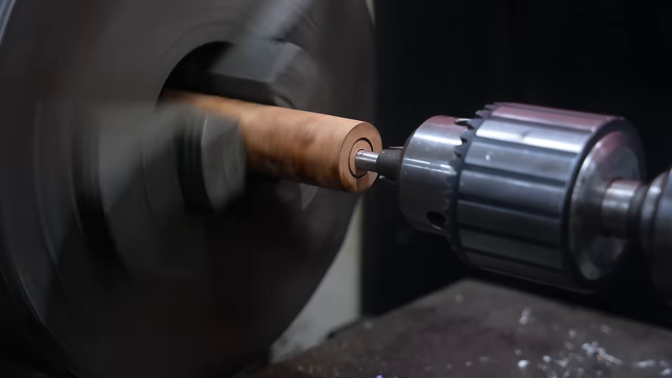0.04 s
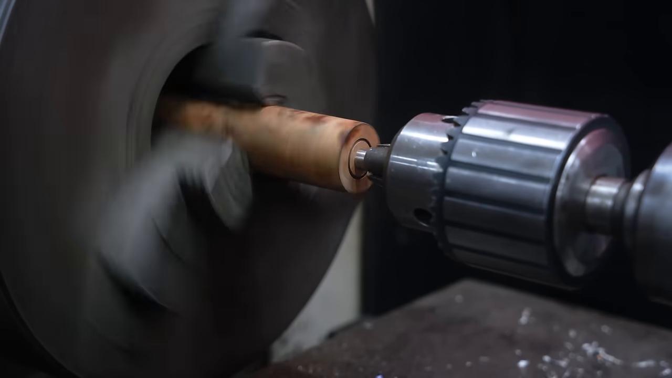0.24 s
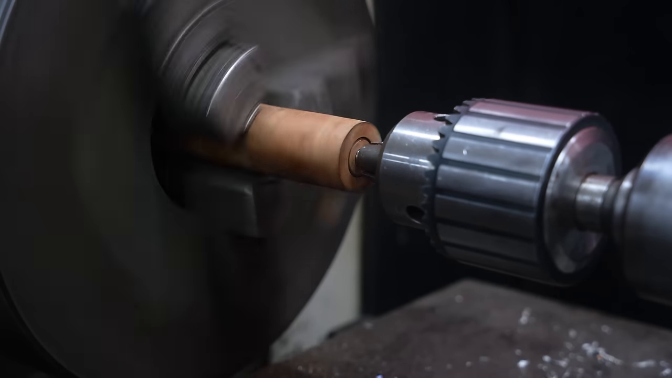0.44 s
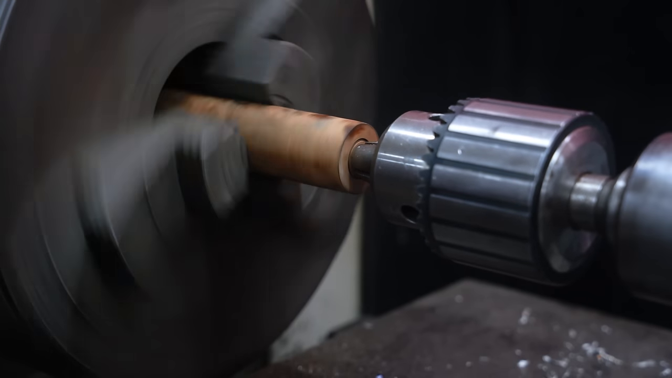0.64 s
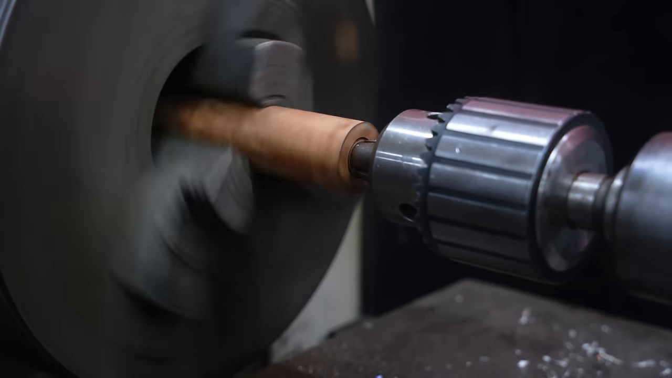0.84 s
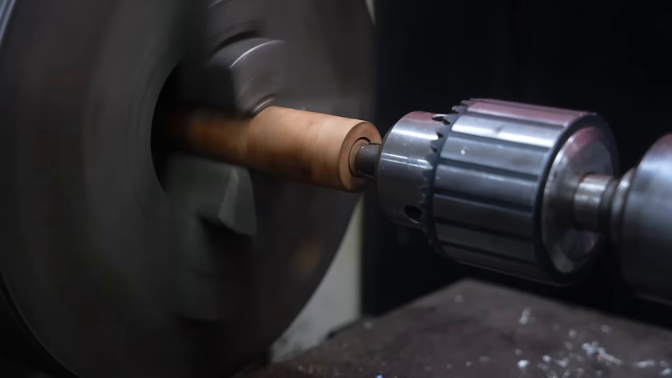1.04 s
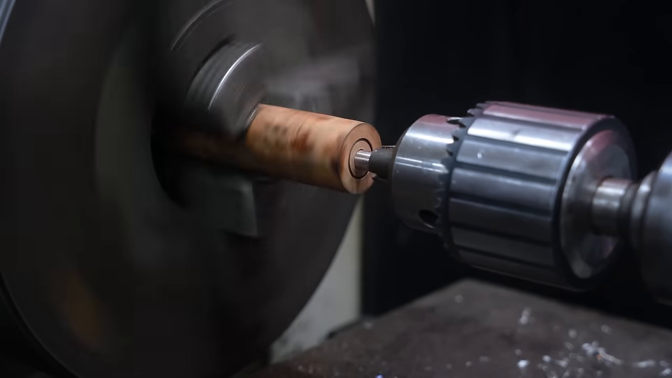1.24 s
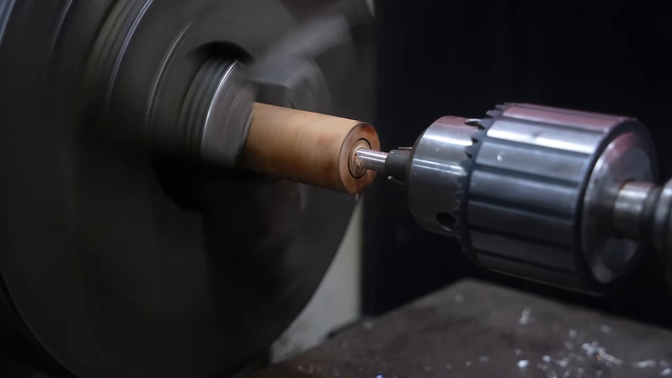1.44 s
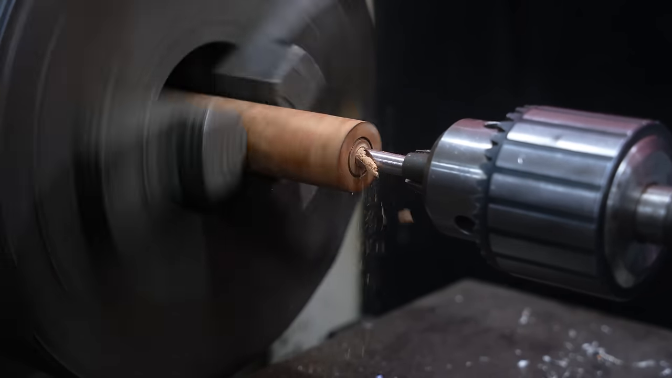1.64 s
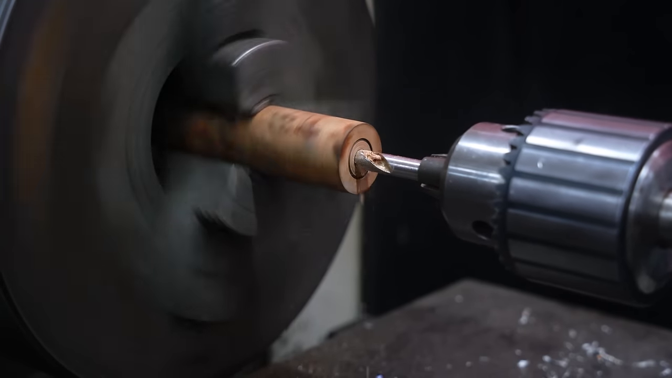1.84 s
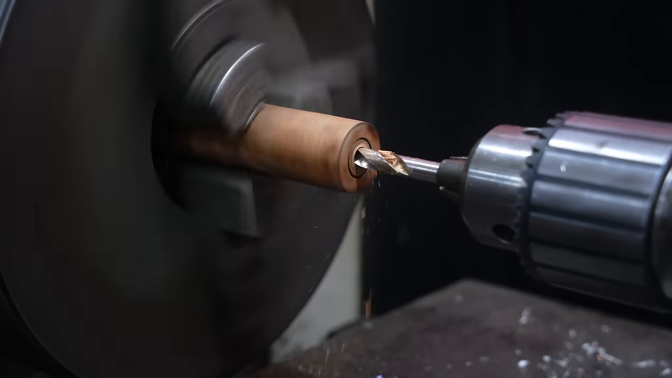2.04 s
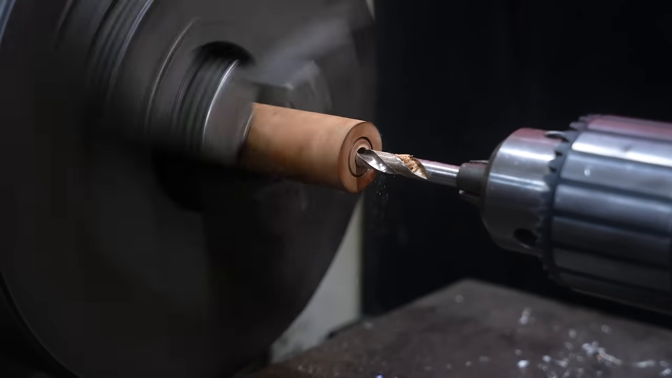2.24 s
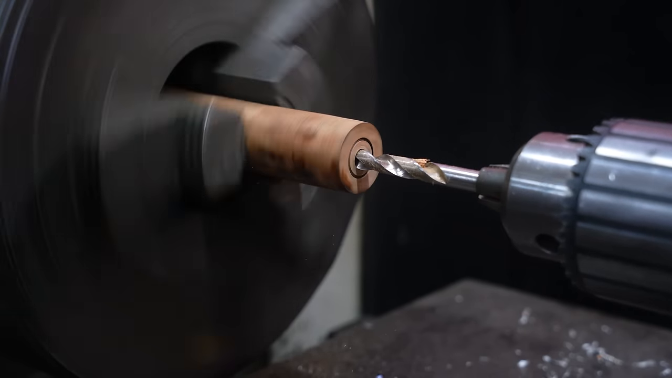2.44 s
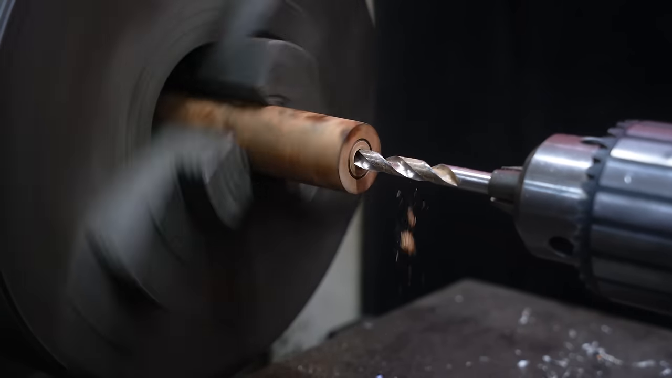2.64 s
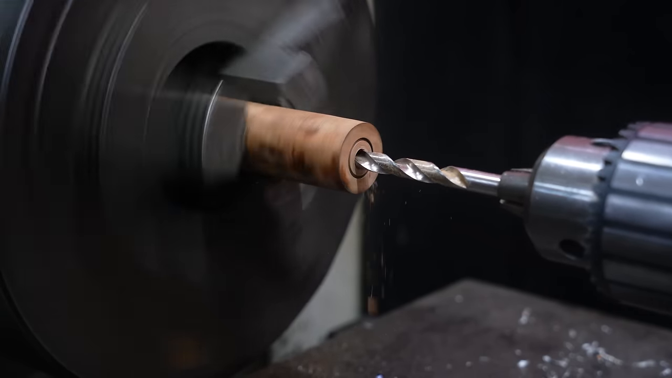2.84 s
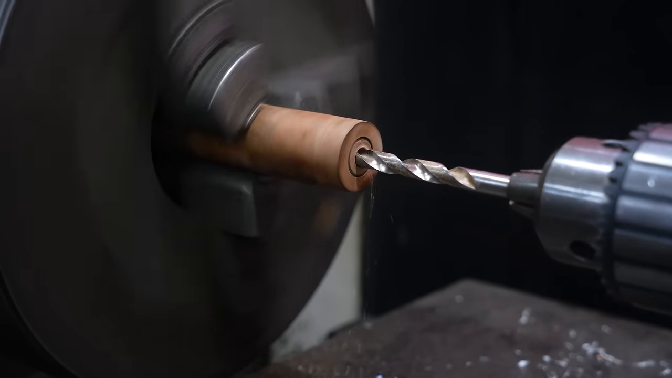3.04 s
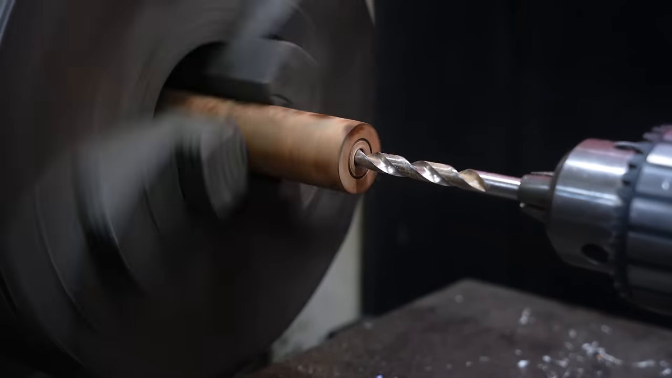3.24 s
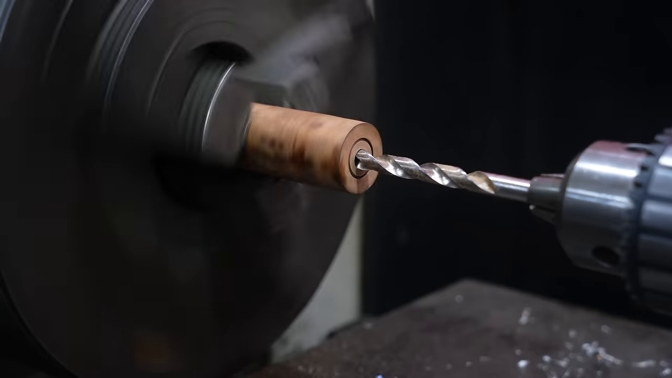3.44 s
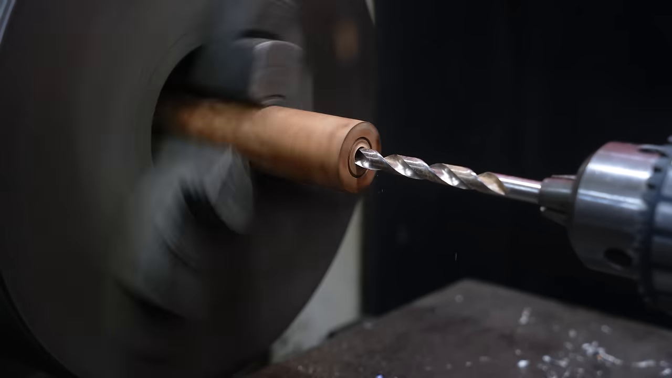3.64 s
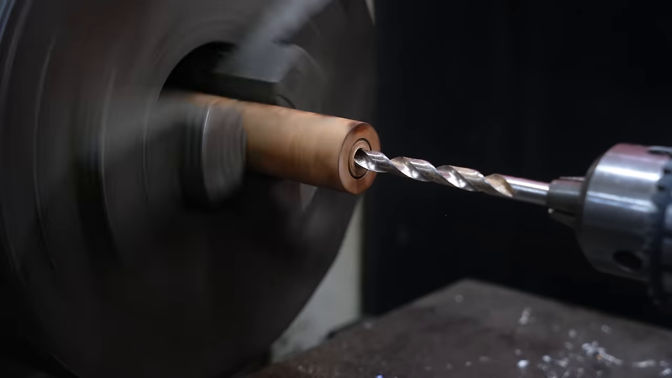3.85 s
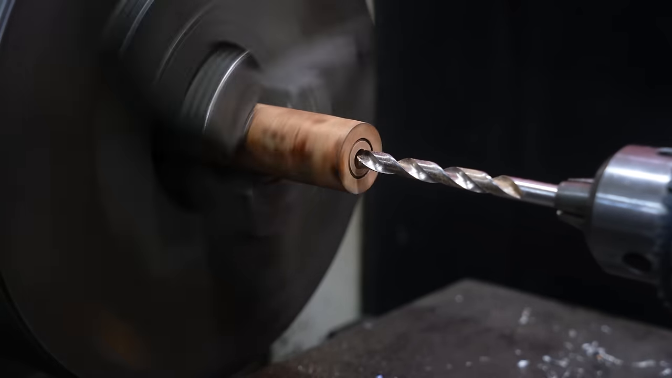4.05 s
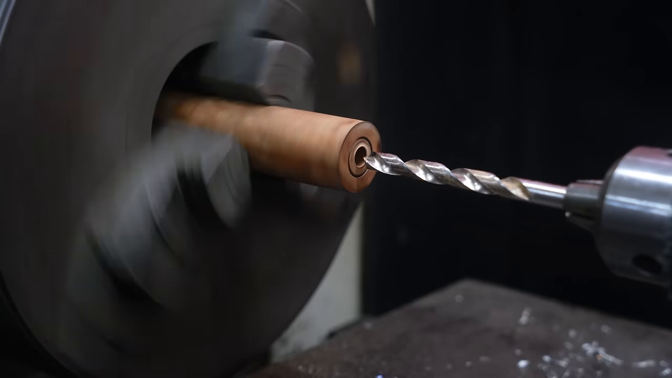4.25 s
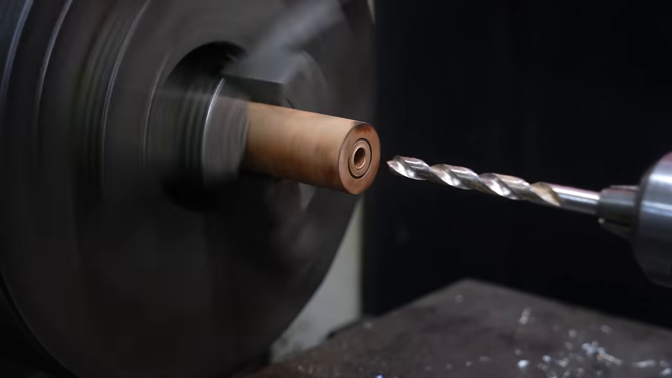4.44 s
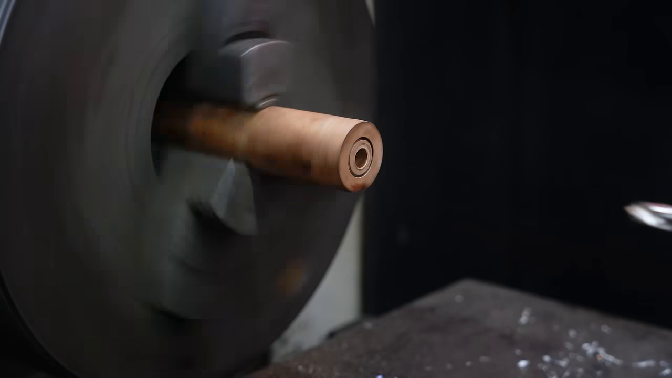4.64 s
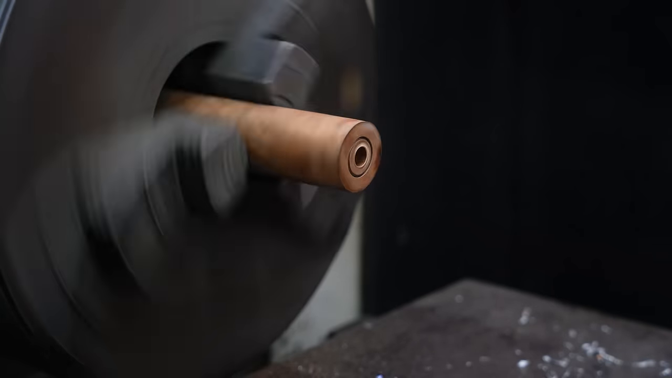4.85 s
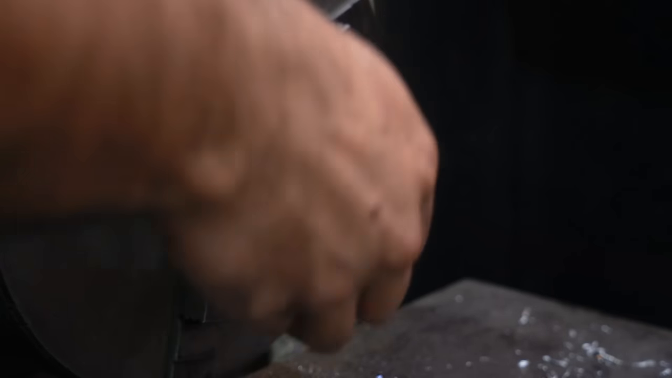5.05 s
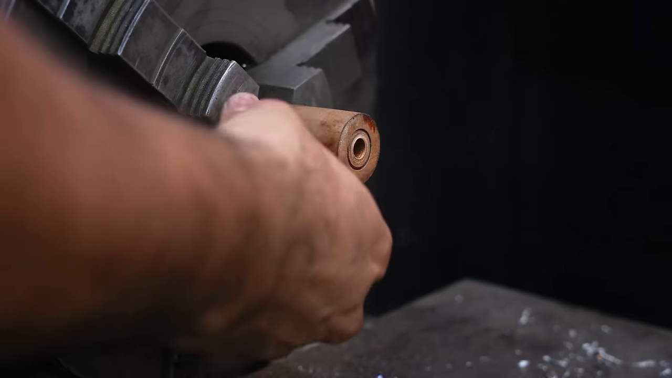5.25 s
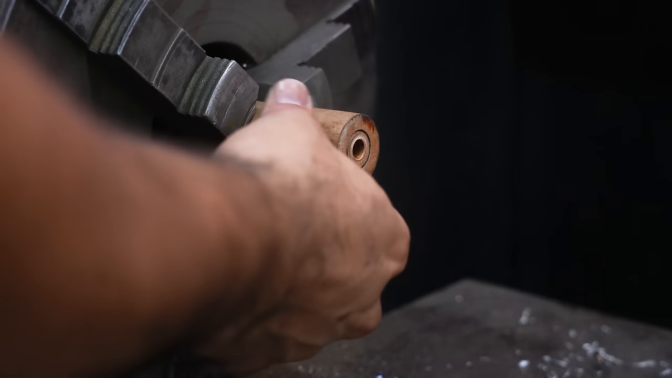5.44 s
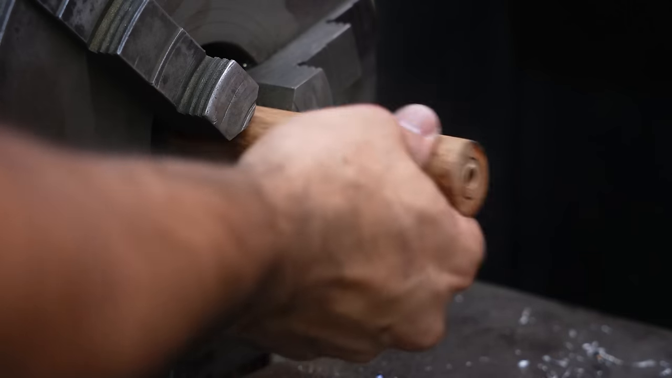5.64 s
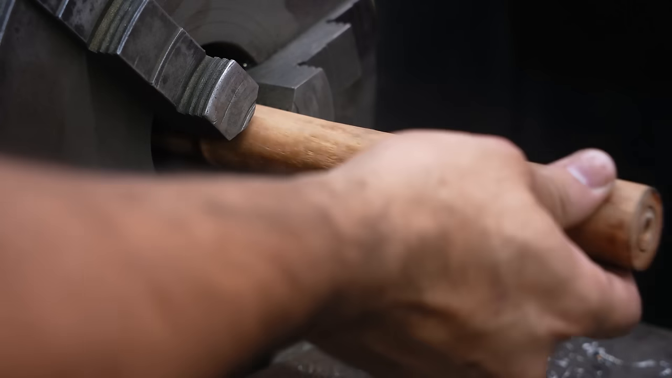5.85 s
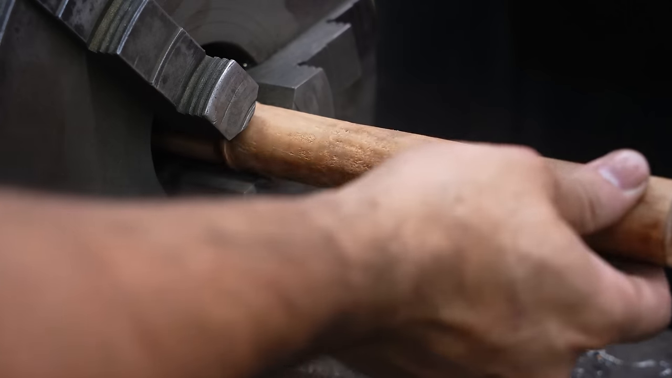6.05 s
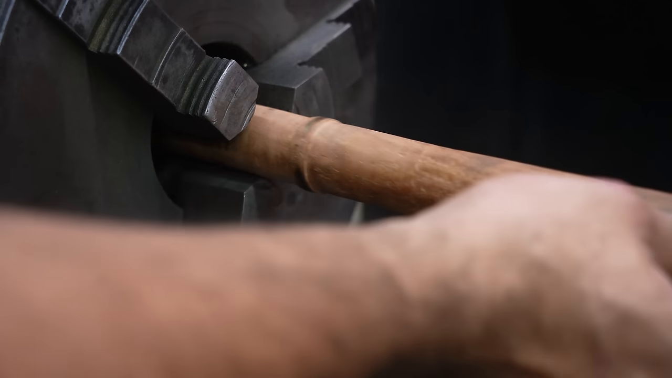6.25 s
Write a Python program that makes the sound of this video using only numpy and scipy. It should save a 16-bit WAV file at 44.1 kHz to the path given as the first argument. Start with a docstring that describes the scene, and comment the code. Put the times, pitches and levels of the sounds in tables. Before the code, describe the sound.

In a hard-walled workshop, close stereo pickup, a bit boring spinning wood gives a loud, glassy squeal that rises and falls about a dozen times a second, with several shrill pitches. It breaks into quick chirps, returns, then fades. The quieter lathe whirr becomes noticeable, with a few rattling knocks. Abruptly the machine is gone; a wooden rod scrapes, rubs against skin and clacks on metal jaws.

```python
"""A bit boring into a wooden rod spun by a lathe wails in several voices amid short squeaks, in a hard-walled workshop.
Stick-slip sines sweep twice a turn as the flutes rub the bore; gear and motor sines whine over shaped noise.
Decaying noise knocks as the tailstock is unclamped; jolts ring the bed.
After a jump in time the lathe stands still: a hand draws the rod out of the jaws, as noise and clicks excite resonances."""
import sys
import numpy as np
from scipy import signal
from scipy.fft import rfft, irfft, next_fast_len
from scipy.io import wavfile
from scipy.ndimage import uniform_filter1d

SR = 44100
rng = np.random.default_rng(int(sys.argv[2]) if len(sys.argv) > 2 else 0)


def wav_record(signal):
    """Record a signal, one row per channel, as 16-bit PCM in the file named by sys.argv[1]."""
    frames = np.transpose(np.atleast_2d(signal))
    bounded = np.clip(frames, -1, 1)
    # unit amplitude maps onto the largest positive 16-bit level
    quanta = np.round(bounded * 32767).astype(np.int16)
    wavfile.write(sys.argv[1], SR, quanta)


N = 278259
T = np.arange(N) / SR   # time in s
EAR_SIGN = np.array([[1], [-1]])   # left, right
STOP_S = 4.915   # the sound of the running lathe gives way to the rod

# Second harmonic of the squeal: t/s, level under the fundamental/dB
OCTAVE_LEVELS = [(0, -21), (.65, -25), (.8, -32), (1.5, -41.5), (2.0, -22.5), (2.2, -38), (2.45, -18),
                 (2.52, -8.5), (2.9, -22.5), (3.3, -14.5)]
# Correlation of the two ears: f/Hz, likeness (0-1)
EAR_LIKENESS = [(60, 0.74), (180, 1), (550, 0.86), (1650, 0.38), (4970, 0.11), (15000, 0.16)]


def from_db(db):
    """Level as a logarithm of amplitude: 20 dB is a factor of ten."""
    return 10 ** (np.asarray(db) / 20)


def rms_one(x):
    """Normalise by the root-mean-square amplitude."""
    return x / np.sqrt(np.mean(x ** 2) + 1e-20)


def in_time(rows):
    """Linear interpolation of each column of a time table, sample by sample."""
    times, *columns = np.transpose(rows)
    return [np.interp(T, times, column) for column in columns]


def at_hz(points, hz):
    """Interpolation of a spectrum along a logarithmic frequency axis."""
    table_hz, values = np.array(points).T
    return np.interp(np.log(hz), np.log(table_hz), values)


def between(t0, t1, fade):
    """A gate with linear ramps: 1 inside the span, 0 outside."""
    return np.clip(np.minimum(T - t0, t1 - T) / fade, 0, 1)


def drift(rate):
    """Low-pass filtered noise of spread 1, wandering at about the given rate in Hz."""
    step = 40   # samples per point of the slow noise
    pole = np.exp(-2 * np.pi * rate * step / SR)
    white = rng.standard_normal(N // step + 2002)
    slow = signal.lfilter([1], [1, -2 * pole, pole * pole], white)[2000:]   # settled part only
    fine = np.interp(np.arange(N) / step, np.arange(len(slow)), rms_one(slow))
    return uniform_filter1d(fine, size=80)


def stereo_noise(spectrum):
    """Interaural coherence: coloured noise, alike in both ears in the bass, less so in the treble; rms 1."""
    # Interaural level difference: f/Hz, left minus right/dB
    ear_lean = [(60, -1), (240, 0.5), (950, -1.5), (3770, 0.5), (15000, 0.5)]
    size = next_fast_len(N)
    hz = np.maximum(np.arange(size // 2 + 1) * SR / size, 1)
    mid, side = rfft(rng.standard_normal((2, size)))
    alike = np.clip(at_hz(EAR_LIKENESS, hz), 0, 1)
    both = np.sqrt(1 + alike) * mid + np.sqrt(1 - alike) * side * EAR_SIGN
    lean = from_db(at_hz(ear_lean, hz) / 2 * EAR_SIGN)
    coloured = both * lean * from_db(at_hz(spectrum, hz))
    return rms_one(irfft(coloured, size)[:, :N])


def tone(hz, waver_db, rate):
    """Amplitude and phase modulation of a sine, less alike in the two ears where coherence is low."""
    phase = 2 * np.pi * np.cumsum(hz) / SR + .5 * drift(rate)
    swell = drift(rate)
    apart = 1 - np.clip(at_hz(EAR_LIKENESS, hz[0]), 0, 1)
    ears = []
    for _ in range(2):
        strength = np.sqrt(2) * from_db(waver_db * (swell + apart * drift(rate)))
        ears.append(strength * np.sin(phase + apart * drift(5.4)))
    return np.array(ears)


def ring(x, hz, t60):
    """A damped oscillator: a unit click starts a sine of initial height about 1, falling 60 dB in t60 seconds."""
    r, w = from_db(-60 / (t60 * SR)), 2 * np.pi * hz / SR
    return signal.lfilter([0, np.sin(w)], [1, -2 * r * np.cos(w), r * r], x + 1e-18)


def ring_wide(x, hz, width):
    """Resonance as a band-pass whose Q is centre frequency over bandwidth; rms 1."""
    return rms_one(signal.lfilter(*signal.iirpeak(hz, hz / width, fs=SR), x))


def workshop(x, t60=0.61, level_db=-6):
    """Reverberation: direct sound plus an exponentially dying tail of reflections, another in each ear."""
    t = T[:SR]
    build_up = np.clip(t / 0.011, 0, 1)
    tail = rng.standard_normal((2, SR)) * from_db(-60 * t / t60) * build_up
    tail /= np.sqrt(np.sum(tail ** 2, axis=1, keepdims=True))   # unit energy
    reflected = signal.fftconvolve(np.broadcast_to(x, (2, N)), tail, axes=1)[:, :N]
    return x + from_db(level_db) * reflected


def squeal():
    """Stick-slip friction drives voices and squeaks; the squeal has a short reverberation."""
    # Voices of the bit: t/s, lowest f/Hz, highest f/Hz, level/dB, loss where the grip is weakest/dB
    low_voice = [(0, 6675, 7710, -13.5, 6.5), (.45, 6803, 7870, -15, 5), (.62, 6970, 7900, -26.5, -6.5),
                 (.66, 7100, 7890, -16, 36.5), (.9, 7300, 7795, -11.5, 40), (1.67, 7250, 7826, -17, 37),
                 (1.74, 7300, 7800, -69, 48.5), (2.5, 7550, 7900, -67, 15), (2.525, 7250, 8460, -26, -4.5),
                 (2.66, 7370, 7880, -19.5, 1), (2.8, 6910, 7480, -20, 0.5), (2.86, 7220, 7130, -40, 9)]
    middle_voice = [(0.269, 9900, 10000, -46, 24), (.3, 10200, 10460, -16.5, 18),
                    (0.421, 10010, 10500, -31, 27), (0.459, 9980, 10520, -16.5, 6.1),
                    (.7, 10270, 10580, -20.5, 2.9), (.95, 10230, 10710, -22, 7.5),
                    (1.05, 10240, 10600, -16, 15), (1.64, 10210, 10520, -15.5, 26),
                    (1.69, 10300, 10900, -73, 35)]
    high_voice = [(.94, 11250, 11800, -73.5, 40), (.98, 10800, 11600, -20, 16),
                  (1.4, 10900, 11710, -5.5, 84), (1.68, 10870, 11900, -1, 240),
                  (1.732, 11230, 11800, -21, 6.8), (1.905, 10900, 11650, -22, 4.2),
                  (2.08, 10700, 11570, -9, 25), (2.1, 10660, 11600, -57.5, 6)]
    last_voice = [(2.879, 6140, 6220, -70, 8), (3.031, 6200, 6500, -40.5, 10), (3.2, 6080, 6230, -62.5, 10),
                  (3.341, 6190, 6300, -44, 13), (3.4, 6065, 6190, -29, 23), (3.531, 6100, 6130, -31, 4.1),
                  (3.699, 6290, 6090, -36, 5.9), (3.73, 6200, 6180, -60, 5)]
    # Each voice within a pass: share at which the pitch is lowest, share spent climbing
    pass_timing = [(.49, .56), (.27, .68), (.19, .76), (.5, .55)]
    # Grip of each voice: second flute weaker by/dB, weakness at bottom, mid climb, top, mid drop
    grip_cycles = [(3.0, 1.1, .6, 0.0, 2.1), (1.5, .1, 0.0, 1.0, .8), (1.5, .6, 1.4, .25, 0.0),
                   (1.5, 0.0, .6, 1.0, .6)]
    # Left minus right of each voice: level/dB
    voice_leans = [0.17, -1.8, -1.2, -1.7]
    jump_s, squeal_t60_s, squeal_room_db = 2.535, 0.33, -8

    voices = (low_voice, middle_voice, high_voice, last_voice)
    dry_squeal = squeaks() + sum(map(wail, voices, pass_timing, grip_cycles, voice_leans))
    dry_squeal *= from_db(drift(45)) * between(0, 9, 0.001)   # the grip on the grain flutters
    # the sound jumps ahead in time: the first part's reverberation is faded out there
    early = between(-1, jump_s - .01, .005)
    first = workshop(dry_squeal * early, squeal_t60_s, squeal_room_db)
    later = workshop(dry_squeal * (1 - early), squeal_t60_s, squeal_room_db)
    return first * between(-1, jump_s + .03, .05) + later


def wail(voice, timing, cycle, lean_db):
    """Periodic stick-slip: each pass the pitch climbs and falls as a flute's bite and grip vary."""
    # Flutes that have passed one spot of the bore: count
    pass_counts = [-1, 7, 11, 35, 37, 50]
    # When each count is reached: t/s
    pass_times = [-.015, .61, .917, 2.715, 2.845, 3.797]
    low_hz, high_hz, level_db, dip_db = in_time(voice)
    bottom, climb = timing
    second_db, *weak = cycle
    passes = np.interp(T, pass_times, pass_counts) + 2 - bottom + .02 * drift(8)
    share, number = passes % 1, (passes + 0.25).astype(int)
    knots = [0, climb / 2, climb, (1 + climb) / 2, 1]
    size = round(.006 * SR)   # rounds the turns of pitch and grip

    height = np.interp(share, knots, [0, .64, 1, .64, 0])   # the pitch lingers near its top
    swing_hz = high_hz - low_hz
    bend = uniform_filter1d(low_hz + swing_hz * height, size=size)
    unsteady_hz = (15 + .06 * swing_hz) * drift(64)
    phase = 2 * np.pi * np.cumsum(bend + unsteady_hz) / SR
    phase = phase + (0.67 + 0.63 * drift(25)) * EAR_SIGN   # the ears differ in phase
    octave_gain = from_db(in_time(OCTAVE_LEVELS)[0] + 2.5 * EAR_SIGN) * (2 * bend < .4 * SR)
    wave = np.sin(phase) + octave_gain * np.sin(2 * phase)

    chance_db = 1.2 * rng.standard_normal(number.max() + 1)   # each pass bites differently
    bite_db = chance_db[number] - second_db * (number % 2)
    grip_db = level_db + bite_db - dip_db * np.interp(share, knots, weak + weak[:1])
    swell = from_db(uniform_filter1d(grip_db, size=size) + 2.3 * drift(120))
    swell = np.maximum(swell, catches(bend) * (level_db > -45))
    ear_waver_db = 1.3 * np.array([drift(60), drift(60)])
    ears = from_db(ear_waver_db + lean_db / 2 * EAR_SIGN)
    return ears * swell * wave * between(voice[0][0] - .01, voice[-1][0], 0.005)


def catches(bend):
    """Transient friction: a flute catches hard and a voice near the listed pitch flares in a sine-squared swell."""
    # Hard catches: t/s, relative level/dB, f/Hz
    flares = [(0.052, -9.5, 7670), (.117, -8, 7430), (.14, -14.5, 7640), (0.197, -11, 7500),
              (0.21, -9.5, 7750), (.226, -17.5, 7650), (0.285, -11, 7810), (0.348, -10.5, 7510),
              (0.439, -9.5, 7800), (0.585, -6.5, 7640), (.632, -14, 10300), (.735, -10.5, 10400),
              (.782, -8, 10300), (.858, -9.5, 10250), (0.882, -6, 10400), (.912, -22.5, 7780),
              (0.93, -7, 10300), (1.029, -7, 10400), (1.085, -11.5, 10300), (1.21, -14.5, 7850),
              (1.236, -13, 10300), (1.2915, -18, 11400), (1.328, -15.5, 10400), (1.559, -13.5, 10400),
              (1.755, -14, 11300), (1.811, -15.5, 11700), (1.901, -15.5, 11000)]
    rise_s, fall_s = 0.004, 0.014
    out, t = np.zeros(N), T[:SR // 10]
    stage = np.interp(t, [0, rise_s, rise_s + fall_s], [0, 1, 2])
    shape = np.sin(np.pi / 2 * stage) ** 2
    for start_s, db, hz in flares:
        at = round(start_s * SR) - round(.002 * SR)   # begins 2 ms ahead
        if abs(bend[at] - hz) < 450:
            out[at:at + len(t)] += from_db(db - 0.5) * shape
    return out


def squeaks():
    """Stick-slip glides: each squeak is a sine with a smooth swell, and slip adds its octave."""
    # Short squeaks: start t/s, relative level/dB, length/s, first f/Hz, last f/Hz
    short_squeaks = [(0.001, -31, 0.041, 9260, 9030), (0.141, -34.5, 0.036, 9700, 10180),
                     (0.712, -24, 0.026, 7020, 7100), (0.714, -27.5, 0.033, 9640, 9600),
                     (1.976, -27.5, 0.013, 7160, 6530), (2.002, -17.5, 0.0045, 6900, 6620),
                     (2.087, -39.5, 0.01, 7500, 7850), (2.1, -18, 0.012, 10900, 11140),
                     (2.115, -17.5, 0.014, 11600, 12000), (2.116, -23, 0.02, 6950, 6030),
                     (2.135, -18.5, 0.014, 11270, 11620), (2.178, -18, 0.018, 10930, 10650),
                     (2.193, -36, 0.035, 5750, 5760), (2.199, -14, 0.019, 10260, 10650),
                     (2.219, -27.5, 0.0082, 6700, 6150), (2.255, -18.5, 0.02, 11900, 10800),
                     (2.271, -33, 0.022, 5680, 5630), (2.273, -16, 0.023, 10350, 10340),
                     (2.297, -13, 0.016, 12200, 12060), (2.316, -19, 0.025, 10720, 10100),
                     (2.334, -27, 0.014, 11650, 11500), (2.344, -24, 0.026, 10000, 10200),
                     (2.385, -22, 0.029, 10520, 10200), (2.357, -25.5, 0.0057, 6360, 7350),
                     (2.409, -22, 0.044, 10130, 10500), (2.419, -17, 0.01, 9850, 9870),
                     (2.422, -26, 0.011, 6170, 7080), (2.45, -22.5, 0.042, 10230, 10140),
                     (2.484, -21, 0.037, 9740, 10030), (2.497, -23, 0.024, 6960, 6970),
                     (2.687, -20, 0.016, 8130, 8800)]
    out = np.zeros((2, N))
    octave_db, = in_time(OCTAVE_LEVELS)
    jitter_hz = 90 * drift(140)
    chance = rng.standard_normal((len(short_squeaks), 3))
    for (start_s, db, length, hz0, hz1), (start, pan, skew) in zip(short_squeaks, chance):
        # x runs 0..1 over the listed length; the swell extends beyond it
        x = np.arange(-.25 * length * SR, 1.18 * length * SR) / (length * SR)
        at = np.arange(len(x)) + round((start_s - .25 * length) * SR)
        hz = hz0 + (hz1 - hz0) * x + jitter_hz[at]
        phase = 2 * np.pi * np.cumsum(hz) / SR + np.pi * start + 1.055 * skew * EAR_SIGN
        octave = from_db(octave_db[at]) * (2 * hz0 < .4 * SR) * np.sin(2 * phase)
        ear_gain = from_db(db + 2 + (-1.5 + 2 * pan) * EAR_SIGN)
        wave = ear_gain * np.hanning(len(x)) * (np.sin(phase) + octave)
        out[:, at[at >= 0]] += wave[:, at >= 0]
    return out


def lathe():
    """Gear-mesh harmonics and motor tones over broadband rush of bearings, belt and chuck, which rings the housing."""
    # Running lathe: t/s, whine reference level/dB, rush level/dB
    lathe_levels = [(0, -51, -43), (1.2, -49.5, -42.5), (2.8, -48, -39.5), (3.55, -46.5, -36),
                    (3.8, -48, -36), (4.9, -42, -31.5)]
    # Gear harmonics: multiple of the mesh rate, relative starting level/dB
    gear_harmonics = [(1, -2.5), (2, -4.5), (3, -8), (4, -5.5), (5, -11), (6, -1)]
    # Motor tones: f/Hz, relative level/dB
    motor_tones = [(215, -24.5), (470, -12.5), (694, -12.5), (898, -2)]
    # Rush before the housing rings: f/Hz, relative spectral level/dB
    rush_spectrum = [(88, -58), (201, -23), (431, -6.5), (578, 0), (1790, -2), (2760, -4), (3350, -2.5),
                     (7770, -24), (12700, -61), (16000, -43.5)]
    # Housing resonances: f/Hz, bandwidth/Hz, relative level/dB
    housing_rings = [(757, 25, -19), (1205, 35, -17), (1345, 70, -13), (1785, 80, -11), (3520, 50, -21),
                     (3625, 35, -19), (3990, 60, -23)]
    whine_db, rush_db = in_time(lathe_levels)
    mesh_hz = 519.5 * (1 + .003 * drift(6))   # the speed wavers
    gears = 0
    for k, db in gear_harmonics:
        brighter_db = 0.1786 * k * T   # higher harmonics grow faster
        gears = gears + from_db(db + brighter_db) * tone(round(k) * mesh_hz, 2.6, 25.0)
    motor = sum(from_db(db) * tone(np.full(N, hz), 3.3, 9) for hz, db in motor_tones)
    # a thin, faint high whine, heard from 2.9 s on
    high_whine = tone(12470 + 30 * drift(24.04), 2.9, 26) * between(2.9, 9, 0.047)
    motor += from_db(-27) * high_whine

    rush = stereo_noise(rush_spectrum)
    housing = sum(from_db(db) * ring_wide(rush, hz, width) for hz, width, db in housing_rings)
    rush = from_db(rush_db + 1.55 * drift(120)) * rms_one(rush + housing)
    whine = from_db(whine_db - 1.3 / 2 * EAR_SIGN) * (gears + motor)   # leans to the right
    return (whine + rush) * between(-1, STOP_S + 0.017, 0.017)


def tailstock():
    """Impact decay: each knock of the clamp is an exponentially dying rattle with a bright sliding hiss."""
    # Clamp knocks: t/s, relative level/dB, t60/s, hiss relative to body/dB
    clamp_knocks = [(3.603, -15.5, 0.2, -10), (3.65, -27, 0.16, -33), (3.694, -30.5, 0.42, 4.5),
                    (3.89, -28, 0.096, 1.5)]
    # Body of a knock: f/Hz, relative spectral level/dB
    clamp_spectrum = [(290, -59), (500, -20), (1070, -17), (1400, -6), (1760, -2), (2810, -8.5),
                      (6000, -28), (7800, -43.5), (13200, -120)]
    body = stereo_noise(clamp_spectrum)
    hiss = stereo_noise([(2500, -14), (5000, 6.0), (16000, -10.5)])
    out = 0
    for start_s, db, t60, bright_db in clamp_knocks:
        after = np.maximum(T - start_s, 0)
        build_up = np.clip(after / 0.0068, 0, 1)
        dying = build_up * from_db(db - 4.5 - 60 * after / t60)
        out = out + dying * (body + from_db(bright_db) * hiss)
    return workshop(out * from_db(2 * drift(162)))   # grain of the rattle


def rod_drawn_out():
    """Friction and impact excite modes: rubbing rings the rod, skin hisses on wood, the rod taps a jaw."""
    # Rod and hand on the jaws: t/s, rub level/dB, skin hiss level/dB
    slide_levels = [(4.93, -47.5, -55.5), (5.02, -41.5, -52), (5.1, -40, -47), (5.2, -44.5, -52),
                    (5.27, -36, -47.5), (5.37, -39.5, -54.5), (5.5, -48, -63), (5.62, -40.5, -51),
                    (5.69, -36.5, -45.5), (5.78, -38.5, -51.5), (5.87, -39, -42.5), (5.97, -39.5, -55.5),
                    (6.1, -56, -59), (6.19, -49.5, -57.5), (6.3, -50.5, -67)]
    # Rod resonances: f/Hz, bandwidth/Hz, relative level/dB
    rod_modes = [(484, 25, -10), (655, 40, -7), (1030, 50, 5), (1400, 140, 3), (2020, 95, 1),
                 (2440, 40, -6), (3400, 50, -9), (4600, 160, -11)]
    # Rod against a jaw: t/s, relative strengths of rod, lower jaw ring, upper jaw ring, crack/dB
    jaw_taps = [(5.02, -45, -61, -69, -58), (5.257, -39.5, -53, -70, -48), (5.287, -48, -62, -70, -61.5),
                (5.608, -62, -43, -46, -52), (5.722, -41.5, -40, -44.5, -40), (5.7253, -39, -54, -51, -36),
                (6.21, -40.5, -38, -60, -51), (6.233, -54, -30, -42, -56)]
    # Jaw rings: centre f/Hz, t60/s
    jaw_modes = [(1850, 0.14), (3400, 0.048)]
    rub_db, hiss_db = in_time(slide_levels)
    grain = stereo_noise([(40, -60), (300, -10.5), (1000, 6.0), (2500, 0.5), (6000, -43.0)])
    # once the rod slides free its higher rings take over (dB per octave)
    tilt_db = 5 * np.tanh((T - 5.68) * 10)
    rod = 1.45 * grain
    for hz, width, db in rod_modes:
        waver_db = 4 * drift(6.2)   # each ring comes and goes as the grip shifts
        mode_db = db - 9.0 + tilt_db * np.log2(hz / 1400) + waver_db
        rod = rod + from_db(mode_db) * ring_wide(grain, hz, width)
    skin = stereo_noise([(300, -51), (3000, -10), (5000, -13.0), (15000, -27)])
    rub = from_db(rub_db + 2.0 * drift(15.7) + 1.0 * drift(76)) * rms_one(rod)
    rub = rub + from_db(hiss_db) * skin

    blows = np.zeros((4, N))   # impulses to the rod, two jaw rings and crack
    blows[:, [round(row[0] * SR) for row in jaw_taps]] = from_db(np.array(jaw_taps)[:, 1:].T)
    # wood dies within some tens of cycles
    taps = sum(ring(blows[0], hz, 55 / hz) * from_db(db) for hz, width, db in rod_modes)
    for blow, (hz, t60) in zip(blows[1:], jaw_modes):
        for side in (-1, 1):   # a close pair that beats
            taps += ring(blow, hz + side * 12.5, t60)
    crack = rng.standard_normal(SR // 20) * from_db(-60 * T[:SR // 20] / 0.024)   # t60 24 ms
    taps += signal.fftconvolve(blows[3], crack)[:N]
    taps = signal.sosfilt(signal.butter(2, [300, 6000], "band", fs=SR, output="sos"), taps)
    return rub * between(STOP_S, 9, 0.025) + workshop(taps, level_db=-8)


def thumps():
    """Impulse response of one mode: a jolt sets the lowest ring of the lathe bed going."""
    # Jolts of the bed: t/s, impulse level before the band filter/dB
    bed_jolts = [(3.742, -34), (5.726, -35.5)]
    bed_hz, bed_t60_s = 471, 0.19
    jolts = np.zeros(N)
    for start_s, db in bed_jolts:
        jolts[round(start_s * SR)] = from_db(db)
    band = signal.butter(2, [.7 * bed_hz, 1.4 * bed_hz], "band", fs=SR, output="sos")
    return workshop(ring(signal.sosfilt(band, jolts), bed_hz, bed_t60_s))


def room_tone():
    """Stationary coloured noise under a slowly changing level."""
    # Room tone: f/Hz, relative spectral level/dB
    room_spectrum = [(30, -46.5), (60, -31), (80, -6.5), (105, -19), (200, 0), (300, -5), (1000, -8),
                     (2000, -5), (4200, -18), (16000, -38)]
    # Room tone: t/s, relative level/dB
    room_levels = [(0, -81), (2.7, -66.5), (3.9, -57), (6.3, -50)]
    return from_db(in_time(room_levels)[0] + 3.5) * stereo_noise(room_spectrum)


def scene():
    """Linear superposition of all sources."""
    return squeal() + lathe() + tailstock() + rod_drawn_out() + thumps() + room_tone()


def record(dry):
    """Band limitation: a steep low-pass is 50 dB down from 16250 Hz upwards."""
    return signal.sosfilt(signal.cheby2(20, 50, 16250, fs=SR, output="sos"), dry)


dry = scene()
out = record(dry)
wav_record(out)
```